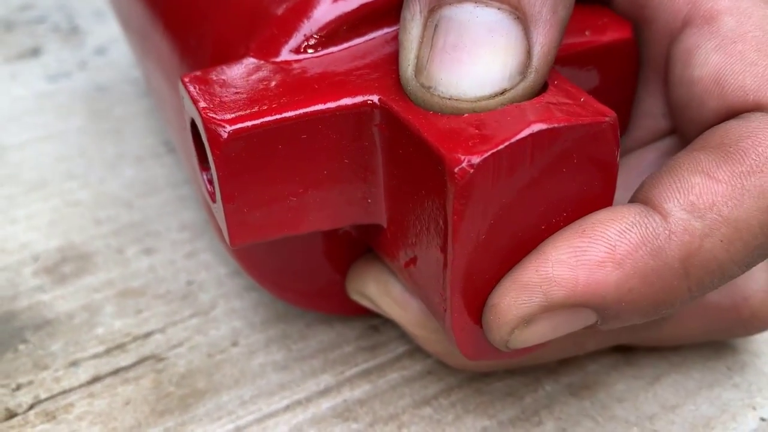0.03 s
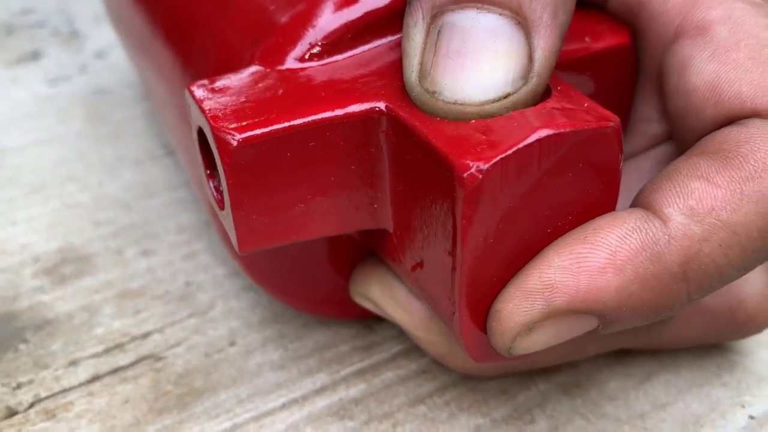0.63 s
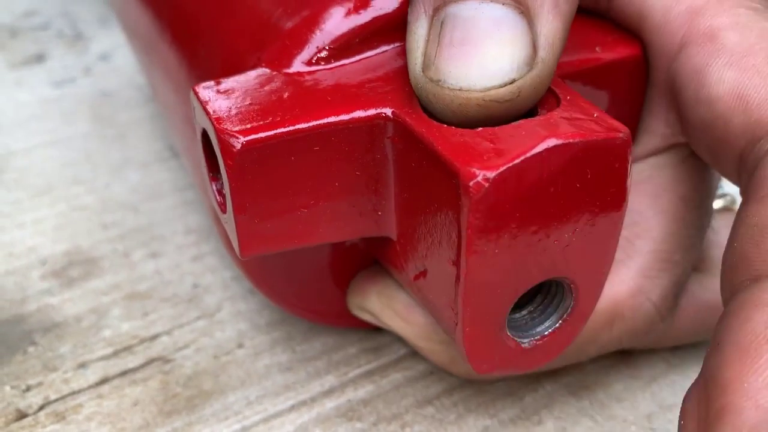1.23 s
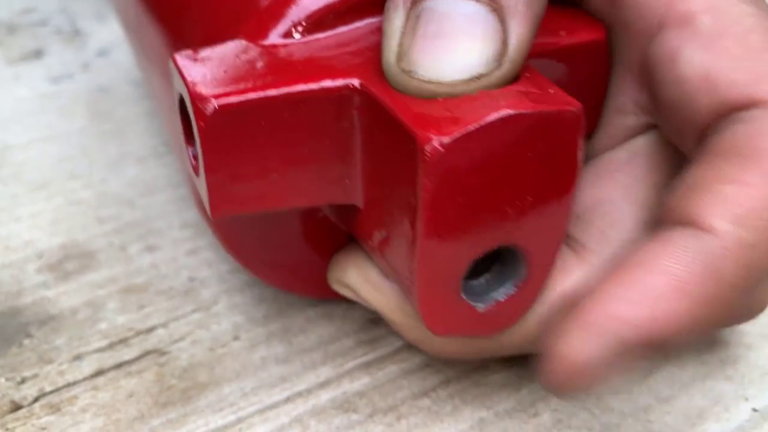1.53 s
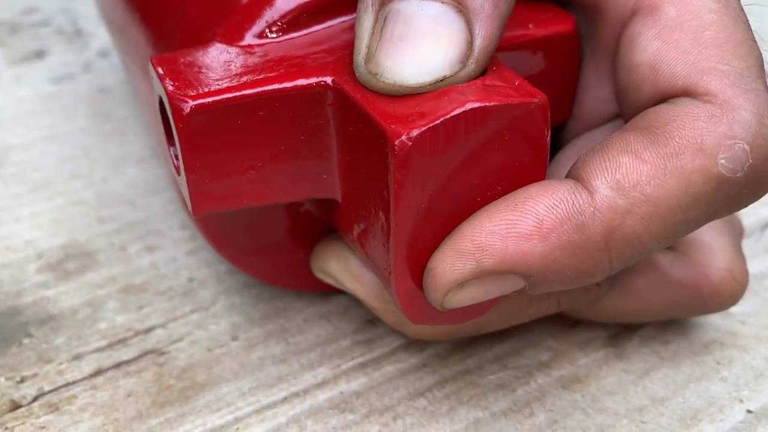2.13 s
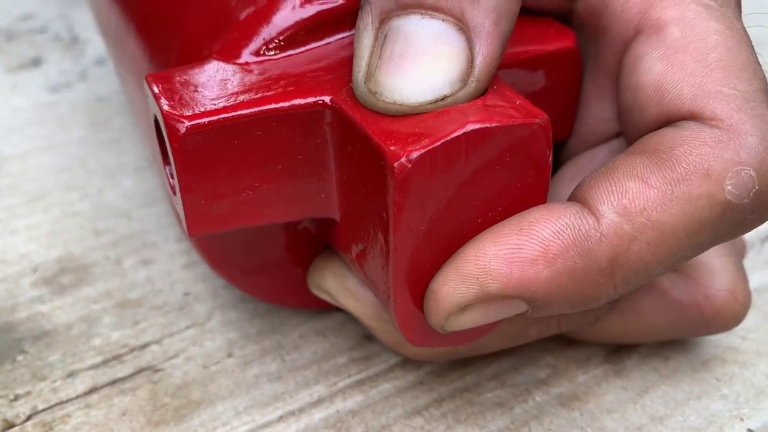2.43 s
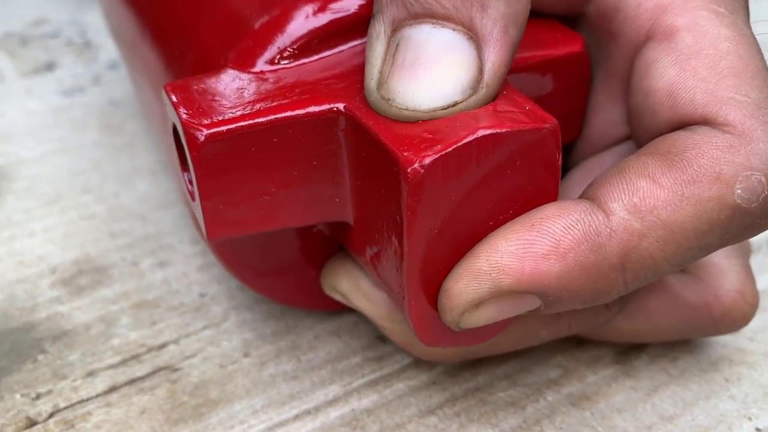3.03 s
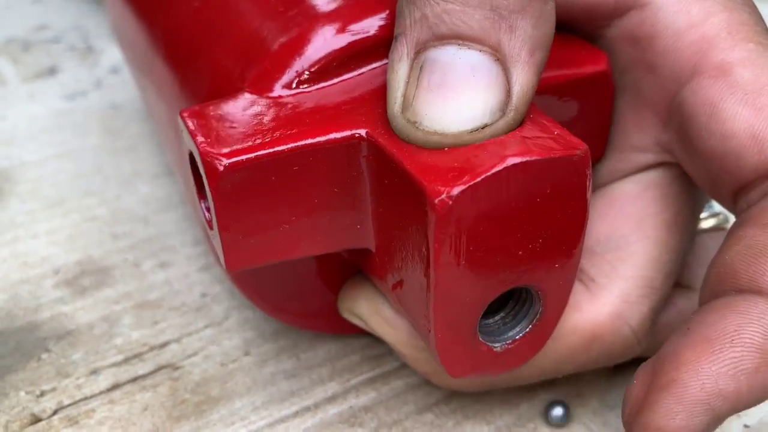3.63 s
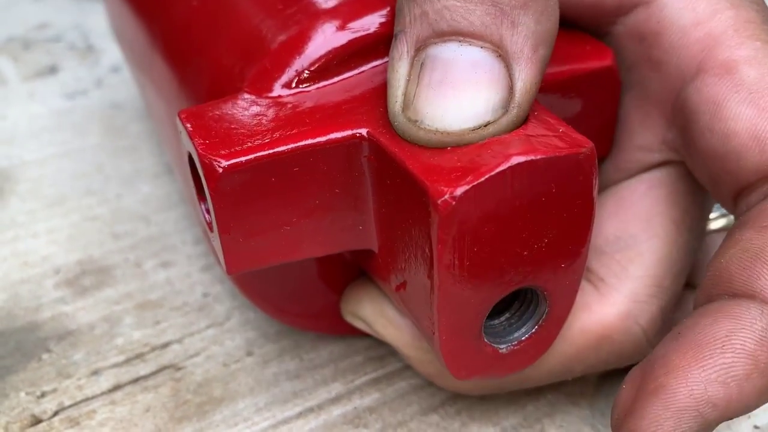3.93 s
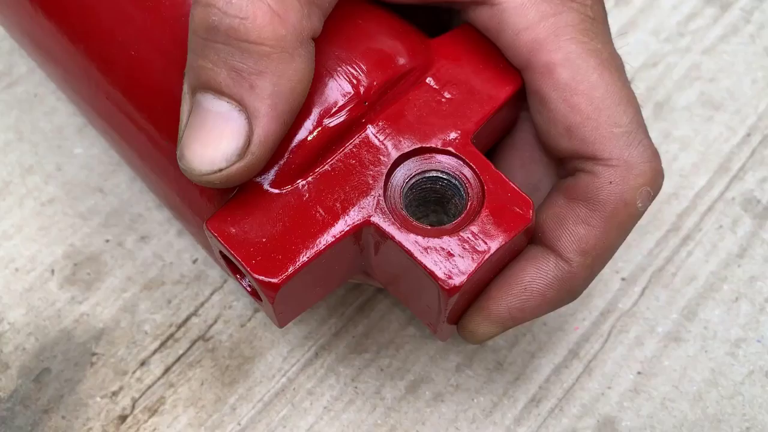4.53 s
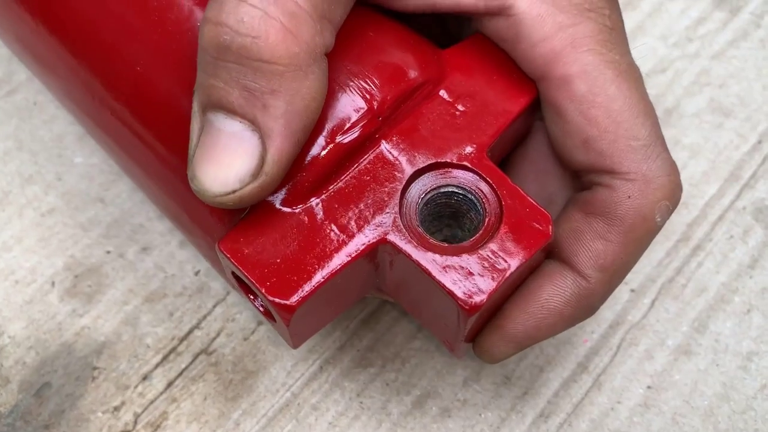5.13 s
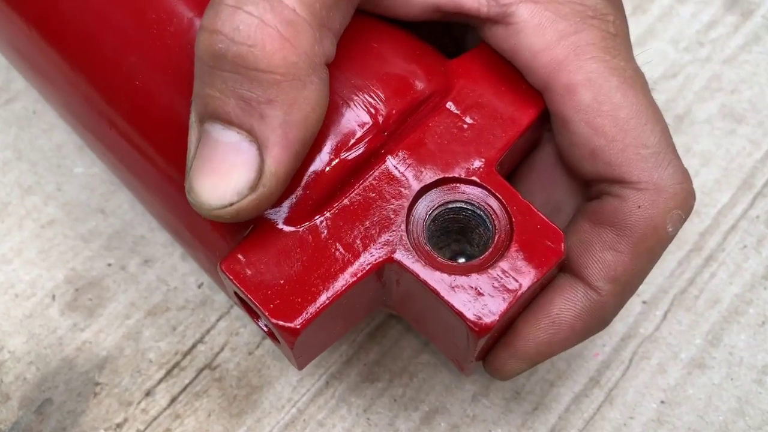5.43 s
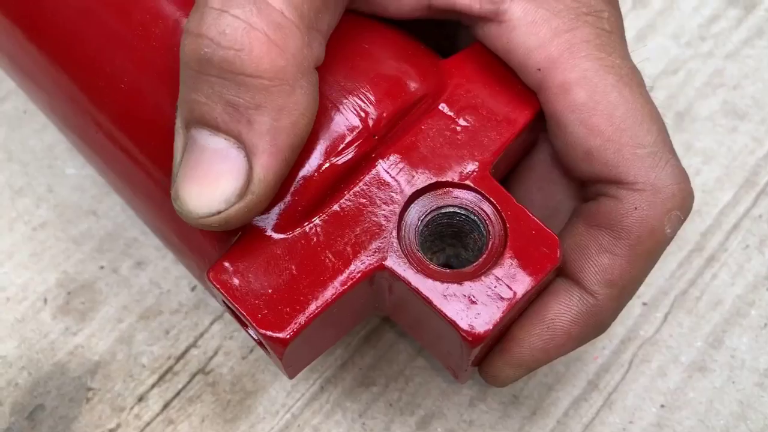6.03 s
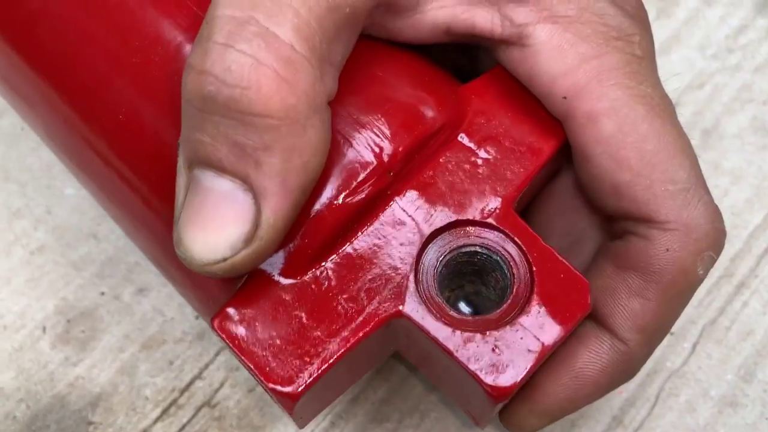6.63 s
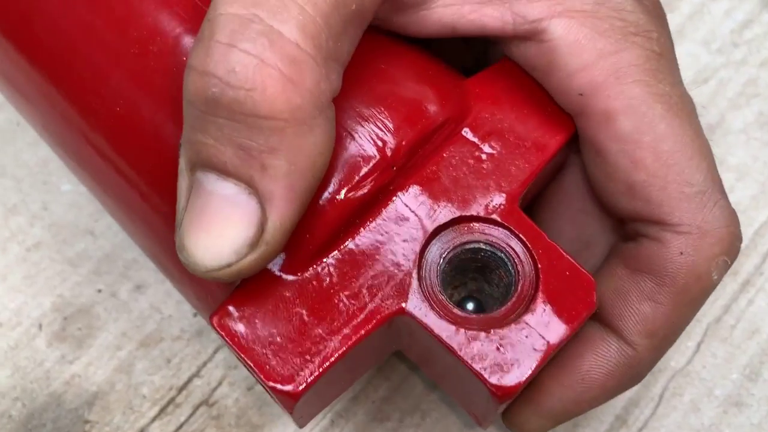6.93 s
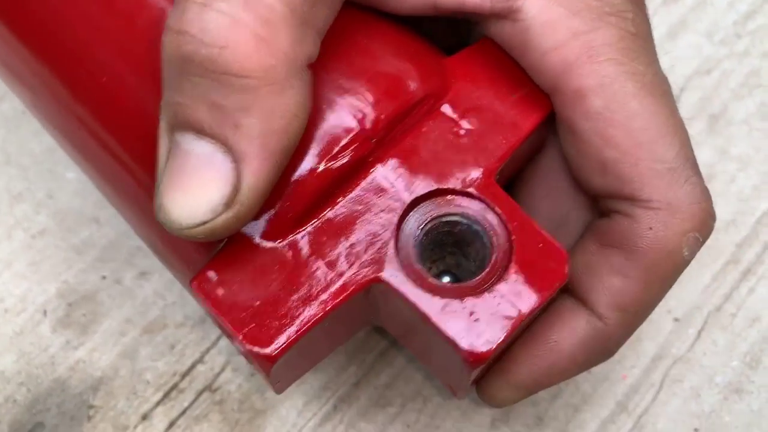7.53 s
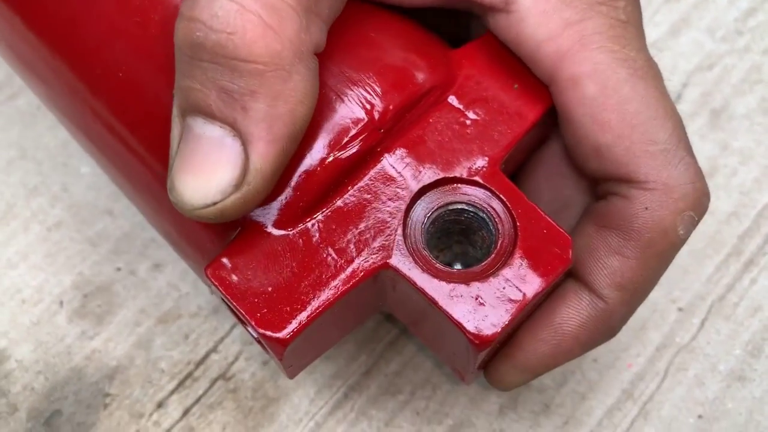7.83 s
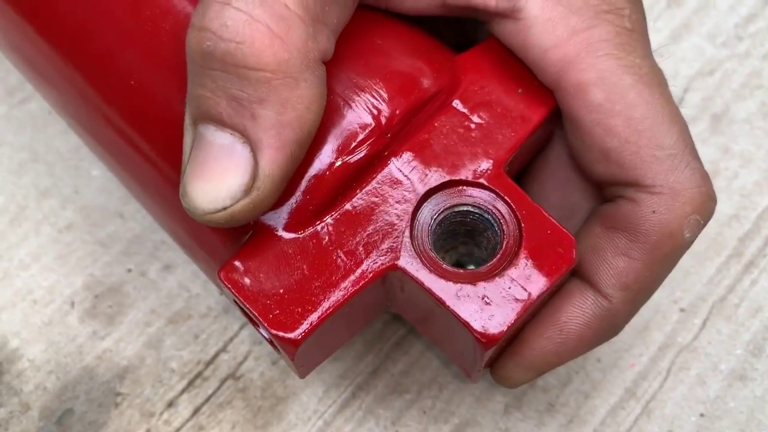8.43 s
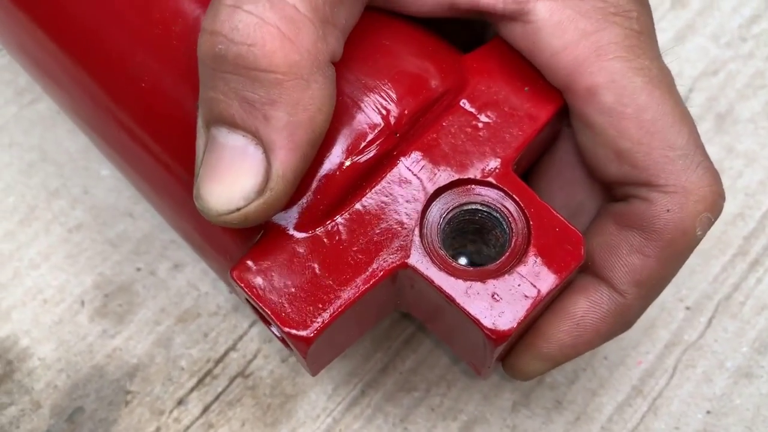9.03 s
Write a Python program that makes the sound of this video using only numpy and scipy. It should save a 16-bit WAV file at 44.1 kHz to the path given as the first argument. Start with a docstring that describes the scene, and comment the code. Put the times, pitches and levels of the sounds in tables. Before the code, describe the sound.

Close up in a still room, air escapes in two separate hisses past a thumb held over a metal pump's port. After the second, air is drawn back in and the seal pops. Then the pump puffs freely eight times, a little under two strokes a second, each a brief hiss. Light clicks, valve pops, faint piston friction and dull bumps of the hands run throughout.

```python
"""A metal hand pump

In a quiet room, a thumb covers the pump's port: air squeezes out past it and is sucked back in, and
the seal pops. Then eight strokes puff through the open port, each a turbulent jet. Between them the
piston slides back with a faint friction noise and the valve pops, ringing the port cavity.
Each stop jolts the hands and excites the modes of the barrel."""
import sys
import numpy as np
from scipy import signal
from scipy.fft import rfft, irfft
from scipy.io import wavfile
from scipy.ndimage import uniform_filter1d

SR = 44100
rng = np.random.default_rng(int(sys.argv[2]) if len(sys.argv) > 2 else 0)


def dump_mix(stems):
    """Bounce the given channels to the path in sys.argv[1] as a 16-bit WAV at rate SR."""
    frames = np.atleast_2d(stems).T  # one column per channel
    limited = np.clip(frames, -1, 1)  # hard clip at full scale
    pcm = np.round(limited * 32767).astype(np.int16)
    wavfile.write(sys.argv[1], SR, pcm)


N = 409248
TIME = np.arange(N) / SR
HZ = np.fft.rfftfreq(N, 1 / SR)
JET_BAND_HZ, RUB_BAND_HZ, LOW_BAND_HZ = (2000, 16000), (1500, 7000), (25, 1000)

# Levels in all tables are relative; a source may add a gain of its own.
# open-port pushes: (full flow t/s, stop t/s, air level/dB, onset softness/dB, bump level/dB,
# return rubbing level/dB)
OPEN_PUSHES = [(4.742, 4.894, -27, 4, -42.5, -55.5), (5.327, 5.515, -27.5, 4, -46, -57),
               (5.955, 6.124, -27.5, 4.5, -36.5, -57), (6.595, 6.757, -28, 0.5, -35, -58),
               (7.206, 7.378, -27, 0.5, -40.5, -61.5), (7.805, 7.966, -28, 1.5, -37, -65),
               (8.38, 8.573, -28, 1.5, -46, -68.5), (9.023, 9.165, -28, -1, -46, -70)]
# the push that lifts the thumb: (full flow t/s, stop t/s, air level/dB, onset softness/dB, bump level/dB)
LIFT_PUSHES = [(1.09, 1.216, -27, 6.5, -41.5)]
# flow squeezing out under the thumb: (t/s, level/dB)
LEAK_FLOW = [(2.9, -72), (2.96, -50.5), (3.018, -37.5), (3.046, -51), (3.062, -39), (3.318, -37.5),
             (3.346, -31), (3.42, -23.5), (3.45, -77)]
# phase lead of left over right, for all noise but the open-port jet: (f/Hz, phase/rad)
STEREO_PHASE = [(1500, 0.5), (2150, -4.5), (2800, -1.5), (4000, -2.5), (5900, -1), (6700, -1), (7700, -2.5),
                (8600, 1.5), (9500, -0.5), (10700, 2), (13150, -12.5), (15300, -3.5)]


def open_port_jet():
    """A turbulent jet leaves the open port as a hiss with peaks and dips in its colour."""
    # jet spectrum: (f/Hz, level/dB)
    spectrum = [(200, -26.5), (450, -17.5), (1200, -15.5), (2000, -13), (2600, 3.5), (3000, 0.5),
                (4400, -1.5), (5300, -4.5), (5700, 3.5), (8000, -7), (10500, -6), (12000, -6), (13900, 5),
                (15500, -3)]
    # peaks and dips in the colour of the open-port hiss: (f/Hz, width/Hz, level/dB)
    peaks_and_dips = [(2080, 260, 8.5), (2450, 116, -34), (3470, 91, -7), (2670, 190, 2.5), (3620, 450, 3),
                      (5055, 270, 8), (5560, 61, 2.5), (5590, 89, 2.5), (6970, 260, 3)]
    # phase lead of left over right: (f/Hz, phase/rad)
    phase = [(1500, -1.5), (2300, 3.5), (2500, 1.5), (2900, 5), (3450, 3), (4050, 7.5), (4700, 10),
             (5700, 11.5), (7900, 11.5), (9300, 14.5), (10900, 4.5), (13100, 10.5), (15400, 6)]
    flow = sum(push_flow(*row[:4], drain_db=-24.5) for row in OPEN_PUSHES)
    colour_db = curve(spectrum) + sum(db * lorentzian(hz, width) for hz, width, db in peaks_and_dips)
    return jet(flow, colour_db, gain_db=0.5, flutter_db=1.35, patch_db=2, phase=phase)


def thumb_vent():
    """Compressed air escapes as a turbulent jet when the thumb lifts."""
    # jet spectrum: (f/Hz, level/dB)
    spectrum = [(200, -26), (500, -24.5), (1200, -19.5), (2700, -13), (4000, -8), (5500, -14),
                (7200, -17.5), (8400, -17.5), (9500, -8), (10700, -9.5), (12500, -5.5), (13300, -19),
                (15300, 4.5)]
    flow = sum(push_flow(*row[:4], drain_db=-32.5) for row in LIFT_PUSHES)
    return jet(flow, curve(spectrum), gain_db=1, flutter_db=0.4, patch_db=2.5)


def thumb_leak():
    """Excess pressure forces a hissing jet through the narrow gap under the thumb."""
    # jet spectrum: (f/Hz, level/dB)
    spectrum = [(200, -7), (1000, -16), (1800, -11), (5500, -10), (7200, -12), (8500, -7.5), (10000, -4),
                (10600, -0.5), (12500, 2), (13300, -9), (14100, -3), (15500, 9.5)]
    flow = gain_of(np.interp(TIME, *np.transpose(LEAK_FLOW), left=-np.inf, right=-np.inf))
    return jet(flow, curve(spectrum), gain_db=-2.5, flutter_db=0.5, patch_db=4)


def thumb_suction(seal_db_per_s=1700.5):
    """A partial vacuum draws air in past the thumb until it seals the port again."""
    # intakes: (start t/s, end t/s, level/dB, swell/(dB/s), attack/s)
    intakes = [(1.545, 1.59, -49.5, 499, 0.0066), (3.718, 4.087, -32, -17.5, 0.029)]
    # jet spectrum: (f/Hz, level/dB)
    spectrum = [(200, -24.5), (1000, -23), (1700, -17), (2400, -36.5), (4200, -30.5), (6500, -18),
                (8700, -13), (9700, -6), (10800, -3.5), (12900, -4.5), (14100, -16), (14700, -32),
                (15500, -1)]
    flow = np.zeros(N)
    for start, end, db, swell, attack_s in intakes:
        held = np.clip(TIME, start, end) - start
        late = np.clip(TIME - end, 0, 0.1)
        flow += np.minimum(held / attack_s, 1) * gain_of(db + swell * held - seal_db_per_s * late)
    return jet(flow, curve(spectrum), gain_db=3, flutter_db=0.8, patch_db=2)


def push_flow(start, end, db, soft_db, drain_db, open_db_per_s=719, close_db_per_s=1151.5):
    """Flow follows pressure: it builds, falters once, holds, and is cut off as the piston stops."""
    early = np.maximum(start - TIME, 0)
    held = np.maximum(TIME - start, 0)
    late = np.maximum(TIME - end, 0)
    # a soft push swells more slowly and reaches full pressure later
    attack_db = -(open_db_per_s - 39.5 * soft_db) * early - soft_db * np.exp(-held / 0.027)
    falter_db = -2 * np.exp(-((held - 0.034) / 0.0048) ** 2)
    release_db = np.maximum(-close_db_per_s * late, drain_db - 241 * late)  # the last air drains slowly
    return gain_of(np.maximum(db + attack_db + falter_db + release_db, -200))


def jet(flow, colour_db, gain_db, flutter_db, patch_db, phase=STEREO_PHASE):
    """Turbulence at an opening radiates sputtering broadband noise that follows the flow."""
    hiss = patchy(noise(colour_db, JET_BAND_HZ, phase), patch_db, size=(4, 7))
    return hiss * flow * gain_of(gain_db) * flutter(70, flutter_db)


def seal_pops(start_hz=800, end_hz=215, glide_s=0.0013, peel_s=0.0042, peel_db=-11):
    """A pressure release spits air, rings the cavity and knocks, falling in pitch as it evens out."""
    # pops of seal or valve: (t/s, knock level/dB, ring level/dB, spit level/dB, cavity pitch ratio)
    pops = [(0.5926, -25.5, -22, -26.5, 0.97), (1.5925, -17, -19, -57, 0.57), (1.964, -38, -31, -52, 0.842),
            (3.573, -27.5, -35, -47, 1.11), (4.0913, -24.5, -23.5, -30, 0.87),
            (5.209, -23.5, -27, -30, 1.07), (7.6166, -22, -28, -20.5, 0.916),
            (8.2342, -19.5, -24.5, -21, 0.94), (8.712, -40.5, -48, -31, 1.02),
            (8.8405, -24.5, -29.5, -26.5, 0.96)]
    # modes of the port cavity: (f/Hz, level/dB, T60/s)
    modes = [(759, -2, 0.022), (944, -4.5, 0.033), (1458, 5.5, 0.013), (1940, -1, 0.016),
             (2836, -16, 0.033)]
    # spectrum of the spit of air: (f/Hz, level/dB)
    spectrum = [(300, -52.5), (2000, 2.5), (4000, 8.5), (6000, 8.5), (8500, -4), (11000, 1.5), (16000, -2)]
    out, t = np.zeros((2, N)), np.arange(2048) / SR
    cycles = np.cumsum(end_hz + (start_hz - end_hz) * np.exp(-t / glide_s)) / SR
    knock = -np.sin(2 * np.pi * cycles) * pulse(t, peak_s=0.0014)
    air = noise(curve(spectrum), JET_BAND_HZ)
    for s, knock_db, ring_db, spit_db, pitch in pops:
        detune = pitch * rng.uniform(0.94, 1.06, len(modes))
        ring = sum(gain_of(db - 60 * t / t60) * np.sin(2 * np.pi * hz * ratio * t)
                   for (hz, db, t60), ratio in zip(modes, detune))
        ring = ring * (1 - np.exp(-t / 0.00087)) * gain_of([[3], [-3]])  # louder on the left
        spit = air[:, round(s * SR):][:, :len(t)] * pulse(t, peak_s=0.00073)
        add(out, s, gain_of(knock_db) * knock + gain_of(ring_db) * ring + gain_of(spit_db) * spit)
        # the seal peels just before it lets go
        peel = air[:, round(s * SR) - len(t):][:, :len(t)] * np.exp(-t[::-1] / peel_s)
        add(out, s - len(t) / SR, gain_of(spit_db + peel_db) * peel)
    return out


def ticks(rise_s=0.0013, gain_db=2):
    """Brief contacts of piston, fingers and grit give noise bursts, damped by the hands."""
    # clicks of piston and fingers: (t/s, level/dB, tilt/(dB/octave), T60/s)
    clicks = [(0.219, -41.5, -2, 0.12), (0.457, -39.5, -2.5, 0.025), (0.747, -28, 16, 0.024),
              (.884, -42.5, -5, .023), (1.681, -31, 1.5, 0.026), (2.386, -35, 14, 0.082),
              (2.434, -36.5, -3.5, 0.074), (3.119, -34, -3.5, 0.063), (3.606, -32.5, -6, 0.013),
              (4.26, -42, 1, .009), (5.027, -24, 14.5, 0.027), (5.683, -34.5, 4.5, 0.057),
              (6.286, -27.5, 19, 0.027), (6.535, -43.5, 3.5, 0.086), (7.111, -43.5, -6, 0.067),
              (7.489, -31, 7, 0.026), (7.518, -30.5, 1, 0.018), (7.704, -40, -1.5, 0.074),
              (8.088, -28.5, 3, 0.039), (8.163, -40, -1.5, 0.033), (8.313, -42.5, -2.5, 0.083),
              (8.963, -36.5, 1, 0.037)]
    out, t, hz = np.zeros((2, N)), np.arange(4096) / SR, np.fft.rfftfreq(4096, 1 / SR)
    octaves = np.log2((hz + 300) / 4000)
    grit = noise(curve([(300, 5.5), (5500, 6.5), (8500, -2), (15000, -1.5)]), JET_BAND_HZ)
    for s, db, tilt, t60 in clicks + grit_clicks():
        burst = grit[:, round(s * SR):][:, :len(t)]
        scrape = unit_rms(irfft(rfft(burst) * gain_of(tilt * octaves)))
        add(out, s, scrape * gain_of(gain_db + db - 60 * t / t60) * (1 - np.exp(-t / rise_s)))
    return out


def grit_clicks(rate_per_s=7.9, above_rub_db=8, spread_db=3, tilt=3.5, t60_s=0.052, tries=8):
    """Grit catches as a random point process along each slide; gives click rows for ticks()."""
    return [(start + place * (end - start), db + above_rub_db + spread_db * (2 * force - 1), tilt, t60_s)
            for start, end, db, _, _ in slides()
            for place, chance, force in rng.random((tries, 3))
            if chance < rate_per_s * (end - start) / tries]


def piston_friction(rub_gain_db=-2, squeak_gain_db=-8):
    """Sliding friction excites the barrel's resonances and squeaks, while air seeps past the seal."""
    # spectrum of the seal rubbing the bore: (f/Hz, level/dB)
    rub_spectrum = [(100, 5.5), (400, 0.5), (1200, -11.5), (2500, 3.5), (3500, -5.5), (5700, -1.5),
                    (7500, -6.5), (11000, -19.5), (16000, -25)]
    # spectrum of the seeping air: (f/Hz, level/dB)
    seep_spectrum = [(1000, -28), (5000, -58), (8000, -12), (10000, 0), (12500, 2), (15000, 4.5)]
    # barrel resonances under the piston: (f/Hz, width/Hz, level/dB)
    resonances = [(1970, 370, 7), (3060, 130, -15.5), (4550, 1100, 1), (6160, 240, 2.5), (6250, 120, -4)]
    power = 1 + sum(gain_of(db) ** 2 * lorentzian(hz, width) for hz, width, db in resonances)
    rub = noise(curve(rub_spectrum) + 10 * np.log10(power), RUB_BAND_HZ)
    rub = patchy(rub, depth_db=4.5) * flutter(37, depth_db=2.5)
    seep = patchy(noise(curve(seep_spectrum), band_hz=(8000, 16000)), depth_db=5)
    squeak = noise(20 * np.log10(lorentzian(4610, 210)), RUB_BAND_HZ) * flutter(18, depth_db=4)
    out = np.zeros((2, N))
    for start, end, rub_db, seep_db, squeak_db in slides():
        span = slice(round(start * SR), round(end * SR))
        scrape = gain_of(rub_db + rub_gain_db) * rub[:, span] + gain_of(seep_db) * seep[:, span]
        scrape += gain_of(squeak_db + squeak_gain_db) * squeak[:, span]
        add(out, start, scrape * signal.windows.tukey(scrape.shape[1], 0.63))
    return out


def seal_squelch(slips_per_s=80, gain_db=1, spread_db=4, ring_s=0.002, pitches=12):
    """Stick-slip of the greased seal scatters dull grains along each slide."""
    out, t = np.zeros(N), np.arange(1024) / SR
    effort = sum(gain_of(row[2]) * during([row]) for row in slides())
    for hz in np.geomspace(550, 1900, pitches):
        slips = rng.random(N) < slips_per_s / pitches / SR
        strength = gain_of(spread_db * np.minimum(rng.exponential(1, N), 3))
        grain = np.sin(2 * np.pi * hz * t) * np.exp(-t / ring_s)
        out += signal.oaconvolve(slips * strength * effort, grain)[:N]
    return gain_of(gain_db) * out


def slides(after_s=0.065, before_s=0.105):
    """Spans of sliding friction: against the covered port, and back between the open pushes."""
    # port covered: (start t/s, end t/s, rubbing level/dB, seepage level/dB, squeak level/dB)
    covered = [(0, .101, -63.5, -64, -57), (.12, .263, -65.5, -67, -78), (.45, .6, -59.5, -64, -66),
               (.735, .86, -72, -61, -59), (.831, 1.02, -66.5, -60, -80), (1.653, 2.007, -66.5, -71.5, -73),
               (2.115, 2.23, -62.5, -64, -58), (2.27, 2.434, -70.5, -63, -73),
               (2.578, 2.825, -62, -61, -77), (2.88, 3.004, -62, -78, -61), (4.325, 4.491, -62, -73.5, -65),
               (4.493, 4.622, -69, -60.5, -80)]
    returns = [(stop + after_s, following[0] - before_s, db, db - 4, db - 0.5)
               for (_, stop, _, _, _, db), following in zip(OPEN_PUSHES, OPEN_PUSHES[1:])]
    return list(covered) + returns


def palm_thumps(bump_hz=80, swell_s=0.0087, rustle_db=-5):
    """Soft impacts on the palms give heavily damped low tones, with a dull rustle of skin."""
    # the pump shifts in the hands: (t/s, level/dB, f/Hz)
    shifts = [(0.17, -33, 62), (.499, -41.5, 50.4), (.614, -40, 68.4), (1.118, -40, 80), (1.668, -41, 154),
              (2.288, -49.5, 330), (2.355, -46, 348), (2.381, -35.5, 71), (2.581, -38.5, 45.1),
              (4.691, -46, 408), (5.518, -44.5, 253), (6.269, -47.5, 277), (6.661, -43, 69),
              (6.845, -39, 71.75), (6.929, -49.5, 235), (7.041, -48, 309), (7.337, -36.5, 71.6),
              (7.64, -39, 270), (8.262, -42, 262), (8.58, -46, 176)]
    out, t = np.zeros((2, N)), np.arange(4096) / SR
    skin_db = curve([(25, -4.5), (60, 6), (280, -1.5), (600, -26), (2000, -21.5), (8000, -73.5)])
    skin = gain_of(rustle_db) * noise(skin_db, LOW_BAND_HZ)
    for s, db, hz in shifts + [(s, db, bump_hz) for s, db in stroke_ends()]:
        thump = np.sin(2 * np.pi * hz * t) + skin[:, round(s * SR):][:, :len(t)]
        add(out, s, gain_of(db) * thump * pulse(t, swell_s))
    return out


def barrel_ring(coupling_db=-23):
    """The metal barrel rings faintly in free, damped vibration after each stop."""
    # hard knocks: (t/s, level/dB)
    knocks = [(0.224, -55.5), (2.434, -50.5), (3.125, -49)]
    # modes of the metal: (f/Hz, level/dB, T60/s)
    modes = [(1763, 1.5, 0.32), (3760, -12, 0.25), (5450, -18, .25), (9200, -15, .25), (11000, -9, .25)]
    out, t = np.zeros((2, N)), np.arange(SR // 2) / SR
    for s, strike_db in knocks + [(s, db + coupling_db) for s, db in stroke_ends()]:
        for hz, db, t60 in modes:
            tone = np.sin(2 * np.pi * hz * t + rng.uniform(0, 2 * np.pi))
            add(out, s, gain_of(strike_db + db - 60 * t / t60) * tone)
    return out


def stroke_ends(lag_s=0.0079):
    """The stopping piston gives up its momentum in a bump: rows of (t/s, level/dB)."""
    leak_stop = (3.422, -37.5)
    stops = [(row[1], row[4]) for row in LIFT_PUSHES + OPEN_PUSHES] + [leak_stop]
    return [(s + lag_s, db) for s, db in stops]


def grip_rumble(gain_db=-6, ease_s=0.12):
    """Structure-borne rumble of the grip grows as the hands press harder on each slide and push."""
    colour_db = curve([(20, -11.5), (50, 3.5), (90, 3), (150, -7), (300, -3.5), (600, -10.5),
                       (1200, -28.5), (4000, -34)])
    work = gain_of(-58) * during(slides()) + gain_of(-59) * during(LIFT_PUSHES + OPEN_PUSHES)
    work += gain_of(-51.5) * during([(LEAK_FLOW[0][0], LEAK_FLOW[-1][0])])
    effort = gain_of(-58.5) + uniform_filter1d(work, size=round(ease_s * SR))
    return gain_of(gain_db) * noise(colour_db, LOW_BAND_HZ) * effort * flutter(13.8, depth_db=6.5)


def reverberation(x, tail_db=-24, build_s=0.029):
    """Convolution with early reflections and a faint diffuse tail that decays exponentially."""
    # reverberation time: (f/Hz, T60/s)
    decay = [(150, 0.29), (600, 0.11), (2000, 0.14), (5600, 0.22), (10000, 0.27), (16000, 0.11)]
    # reflections off hands, ground and a wall: (left t/s, right t/s, level/dB)
    reflections = [(.00105, 0.0028, -32.5), (.0041, 0.004, -23), (.0073, .0069, -24.5),
                   (0.0134, .0144, -18)]
    hz, t, bins = signal.stft(rng.standard_normal((2, SR // 2)), SR, nperseg=256)
    colour_db = curve([(200, -7.5), (800, 8.5), (3000, 6.5), (5800, 3), (12000, -13.5)], hz)[:, None]
    envelope = gain_of(colour_db - 60 * t / curve(decay, hz)[:, None]) * (1 - np.exp(-t / build_s))
    response = signal.istft(bins * envelope, SR, nperseg=256)[1]
    response *= gain_of(tail_db) / np.linalg.norm(response[0])
    for left_s, right_s, db in reflections:
        response[[0, 1], [round(left_s * SR), round(right_s * SR)]] += gain_of(db)
    return signal.fftconvolve(x, response, axes=1)[:, :N]


def room_tone(level_db=-62):
    """Stationary noise, strongest in the bass, is the floor of the still room."""
    # ambient spectrum: (f/Hz, level/dB)
    spectrum = [(20, -14.5), (45, 8.5), (82, 4), (130, -4), (270, -5), (400, -23.5), (800, -8.5),
                (1600, -19), (3500, -15), (6000, -27), (10000, -58.5), (16000, -58.5)]
    return gain_of(level_db) * noise(curve(spectrum), LOW_BAND_HZ)


def noise(colour_db, band_hz, phase=STEREO_PHASE):
    """Partially coherent stereo noise; the mean of the channels has rms 1 inside the band."""
    # likeness of left and right: (f/Hz, coherence)
    coherence = [(100, 1), (1200, 0.77), (2000, 0.61), (2380, 0.7), (2900, 0.87), (3400, 0.63),
                 (5000, 0.83), (8500, 0.31), (10600, 0.81), (11600, 0.69), (13100, 0.99), (14500, 1),
                 (15400, 0.87)]
    # left minus right: (f/Hz, level/dB)
    balance = [(500, 0), (1200, 1), (1900, 6), (2380, -2.5), (2750, 3.5), (3800, 2), (4800, 3),
               (6000, -0.5), (8000, -2), (12000, 0.5)]
    left, independent = rfft(rng.standard_normal((2, N)))
    same, lean_db = curve(coherence), curve(balance) / 2
    right = (same * left + np.sqrt(1 - same ** 2) * independent) * np.exp(-1j * curve(phase))
    pair = np.array([left * gain_of(lean_db), right * gain_of(-lean_db)]) * gain_of(colour_db)
    in_band = (HZ > band_hz[0]) * (HZ < band_hz[1])
    return irfft(pair, N) / irfft(pair.mean(0) * in_band, N).std()


def patchy(x, depth_db, size=(9, 7)):
    """Friction and turbulence are uneven: the spectrum shifts in random patches of (bins, frames)."""
    bins = signal.stft(x, nperseg=512, noverlap=384)[2]
    field = rng.standard_normal(bins.shape[1:])
    field = uniform_filter1d(uniform_filter1d(field, size[0], 0), size[1], 1)
    return signal.istft(bins * gain_of(depth_db * unit_rms(field)), nperseg=512, noverlap=384)[1][:, :N]


def flutter(rate_hz, depth_db):
    """Random amplitude modulation by low-passed noise."""
    drift = irfft(rfft(rng.standard_normal(N)) / (1 + (HZ / rate_hz) ** 2), N)
    return gain_of(depth_db * unit_rms(drift))


def lorentzian(hz, width_hz):
    """Bell-shaped curve of peak 1 and the given full width at half height."""
    return 1 / (1 + (2 * (HZ - hz) / width_hz) ** 2)


def pulse(t, peak_s):
    """Critically damped impulse response of peak 1."""
    return t / peak_s * np.exp(1 - t / peak_s)


def gain_of(db):
    """Decibels to amplitude."""
    return 10 ** (np.asarray(db) / 20)


def unit_rms(x):
    """Scales to rms 1."""
    return x / np.sqrt(np.mean(x ** 2) + 1e-20)


def curve(points, hz=HZ):
    """Interpolates (f/Hz, value) points on a log-frequency axis."""
    f, value = np.transpose(points)
    return np.interp(np.log(hz + 1), np.log(f + 1), value)


def during(rows):
    """Sum of unit gates, each open from a row's start to its end."""
    return sum(1. * (TIME > row[0]) * (TIME < row[1]) for row in rows)


def add(mix, s, sound):
    """Superposes a sound on the mix at time s."""
    part = mix[:, max(round(s * SR), 0):][:, :sound.shape[-1]]
    part += sound[..., :part.shape[1]]


def scene():
    """Superposition of the pump's direct sound, its reverberation and the low background."""
    pump = thumb_vent() + thumb_leak() + thumb_suction() + open_port_jet()
    pump += piston_friction() + seal_squelch() + barrel_ring() + seal_pops() + ticks() + palm_thumps()
    return pump + reverberation(pump) + grip_rumble() + room_tone()


def record(dry, cutoff_hz=15800):
    """The level dips briefly before the open-port strokes; a low-pass filter limits the band."""
    dip_db = np.interp(TIME, [4.582, 4.6, 4.613, 4.616], [0, -28, -28, 0])
    lowpass = signal.firwin(401, cutoff_hz, window=("kaiser", 8), fs=SR)
    return signal.oaconvolve(dry * gain_of(dip_db), lowpass[None], "same")


dry = scene()
out = record(dry)
dump_mix(out)
```